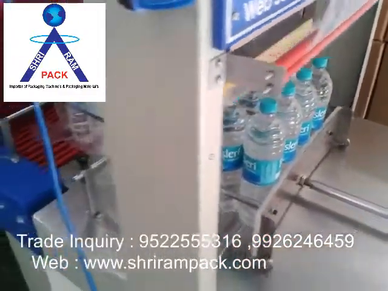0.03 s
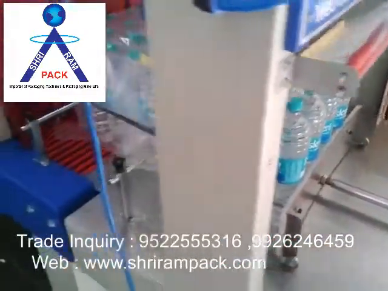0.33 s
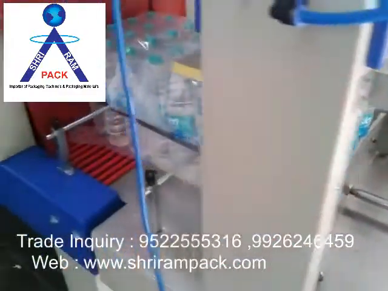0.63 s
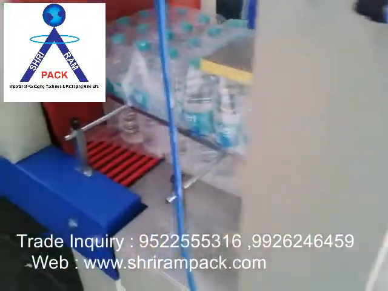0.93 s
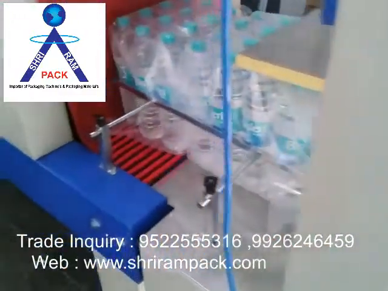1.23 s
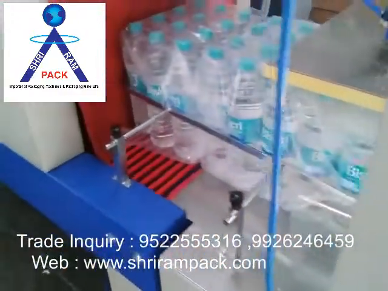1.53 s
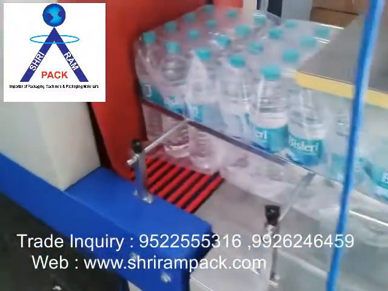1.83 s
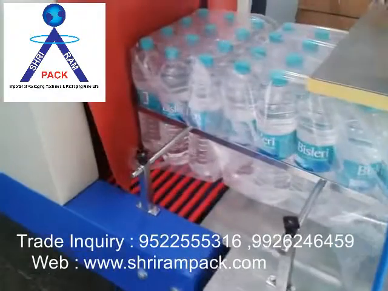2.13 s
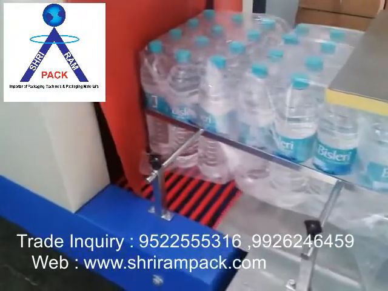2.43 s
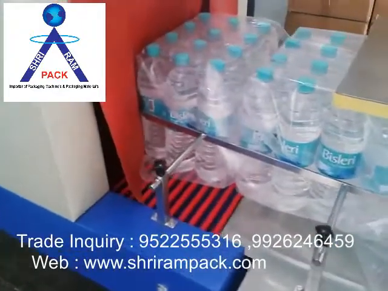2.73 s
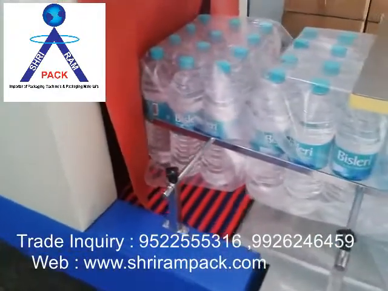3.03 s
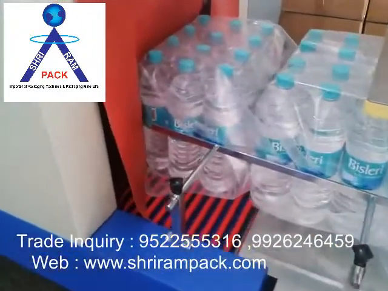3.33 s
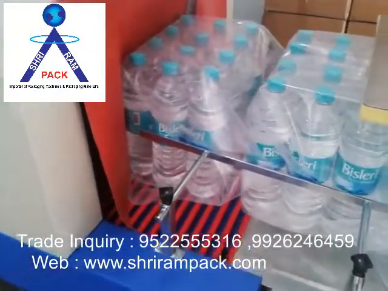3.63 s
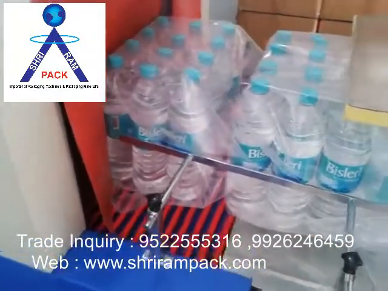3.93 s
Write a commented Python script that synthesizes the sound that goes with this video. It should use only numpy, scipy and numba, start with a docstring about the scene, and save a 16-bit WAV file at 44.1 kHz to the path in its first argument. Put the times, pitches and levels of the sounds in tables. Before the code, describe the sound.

A packaging machine hums and rattles in quick surges in a workshop. Halfway through, a valve cracks open and vents a loud, whistling air hiss over a few dull knocks, then spits shut. The microphone is close.

```python
"""A workshop, close to a running shrink-wrapping machine, on one mono microphone.
The blower hums and the sheet metal rattles in surges, about ten a second. Two seconds in, a pneumatic
valve cracks open and vents air for nearly two seconds: the exhaust rings louder and higher while the
first buffeting dies away. The mechanism knocks as it travels; the valve spits shut and the surges
return. At this short distance the microphone overloads on the hiss."""
import sys
import numpy as np
from scipy import signal
from scipy.fft import rfft, irfft
from scipy.io import wavfile
from scipy.ndimage import uniform_filter1d
from numba import njit

SR = 44100
rng = np.random.default_rng(int(sys.argv[2]) if len(sys.argv) > 2 else 0)


def digitize_waveform(pressure):
    """Quantize a signal to 16-bit integers and store it at the path in sys.argv[1].

    Rows of a 2-D input are taken as channels; values are limited to [-1, 1].
    """
    field = np.atleast_2d(pressure).T
    bounded = np.clip(field, -1, 1)
    quanta = np.round(bounded * 32767).astype(np.int16)
    wavfile.write(sys.argv[1], SR, quanta)


N = 176400
t = np.arange(N) / SR


def undb(db):
    return 10 ** (np.asarray(db) / 20)


def unit(x):
    """Scale to rms 1."""
    return x / np.sqrt(np.mean(x ** 2))


def noise():
    return rng.standard_normal(N)


def curve(rows, column):
    """One column of a table, joined by straight lines in time."""
    rows = np.array(rows, float)
    return np.interp(t, rows[:, 0], rows[:, column])


def equalise(x, outline):
    """Filter by a (frequency [Hz], gain [dB]) outline."""
    hz, db = np.array(outline, float).T
    gain_db = np.interp(np.log(np.fft.rfftfreq(N, 1 / SR) + 1), np.log(hz), db)
    return irfft(rfft(x) * undb(gain_db), N)


def coloured_noise(outline):
    return unit(equalise(noise(), outline))


def butterworth(x, hz, kind):
    return signal.sosfilt(signal.butter(2, hz, kind, fs=SR, output="sos"), x)


def drift(rate_hz):
    """Smooth random wander, rms 1."""
    hold = int(SR / rate_hz)
    steps = np.repeat(rng.standard_normal(N // hold + 1), hold)
    return unit(uniform_filter1d(uniform_filter1d(steps, hold), hold)[:N])


@njit
def bandpass(x, hz, width):
    """State-variable filter whose centre and width may move."""
    y, band_state, low_state = np.empty(len(x)), 0., 0.
    for i in range(len(x)):
        gain, damping = np.tan(np.pi * hz[i] / SR), width[i] / hz[i]
        band = (band_state + gain * (x[i] - low_state)) / (1 + gain * (gain + damping))
        band_state = 2 * band - band_state
        low_state += 2 * gain * band
        y[i] = damping * band
    return y


def ring(excite, modes):
    """Resonances, each driven by its own draw of excite(); rms 1 together."""
    return unit(sum(undb(db) * bandpass(excite(), np.full(N, float(hz)), np.full(N, float(width)))
                    for hz, width, db in modes))


def bursts(rows, outline, rise_s):
    """Coloured noise bursts with a sharp start and an exponential tail."""
    envelope = 0
    for start, db, decay in rows:
        age = np.maximum(t - start, 0)
        envelope += undb(db) * (1 - np.exp(-age / rise_s)) * np.exp(-age / decay)
    return envelope * coloured_noise(outline)


# Surges through the machine (time [s], relative panel level [dB], relative rail level [dB])
SHAKE_SURGES = [(.02, 1, -6), (.075, -0.5, -5), (.155, 2.5, -2.5), (.255, 4, 0.5), (0.351, 2, 1),
                (.46, 2, 2), (.55, 3, -0.5), (.63, -3, -4.5), (0.719, 1, 1), (0.806, 0.5, 0),
                (0.909, 2.5, -1.5), (.97, -2.5, -6), (1.025, 4, -2), (1.11, 1.5, -0.5), (1.205, -3, -13),
                (1.378, 1.5, -1.5), (1.457, 0.5, 0.5), (1.56, 2.5, 1.5), (1.659, 4, 2.5), (1.745, -2, -7),
                (1.86, -3, -3.5), (3.875, -4, -1), (3.93, -5.5, -2), (3.985, -8, -0.5)]
def shaking(column, rest_db, half_width_s=0.033):
    """The machine shakes in rounded surges over a resting level; the envelope has rms 1."""
    power = undb(rest_db) ** 2
    for surge in SHAKE_SURGES:
        bell = np.exp(-np.abs((t - surge[0]) / half_width_s) ** 2.22)  # slightly flat on top
        power += undb(surge[column]) ** 2 * bell
    return unit(np.sqrt(power))


# Motor and blade tones radiated by the panels (frequency [Hz], level [dB])
BLOWER_TONES = [(130, -58.5), (441, -38.5), (489.5, -34), (1087, -51), (1798, -47.5), (2223, -40)]
# Colour of the blower's air (frequency [Hz], relative level [dB])
BLOWER_COLOUR = [(30, -26), (70, -15), (130, -10), (190, -16), (260, -1), (800, 5), (1300, -4.5), (2000, 3),
                 (2700, -6.5), (5500, -2), (9000, -22.5), (15500, -27)]
def blower(panel_shake):
    """Steady air noise, with wavering motor and blade tones that swell as the panels shake."""
    tones = 0
    for hz, db in BLOWER_TONES:
        amplitude = np.sqrt(2) * undb(db + 2 * drift(14))
        wavering_hz = hz * (1 + 0.003005 * drift(12))
        tones += amplitude * np.sin(2 * np.pi * np.cumsum(wavering_hz) / SR)
    air = undb(-27 + 0.84 * drift(8)) * coloured_noise(BLOWER_COLOUR)
    return tones * panel_shake + air


def contacts(per_second=2500, spread_db=3.0):
    """Dense tiny impacts of uneven strength."""
    hits = (rng.random(N) < per_second / SR) * np.sign(noise())
    strength = undb(spread_db * np.minimum(rng.exponential(size=N), 4))
    return unit(hits * strength)


# Ringing of the panels and loose guide rails (frequency [Hz], width [Hz], relative level [dB])
PANEL_MODES = [(257, 21.5, -0.5), (426, 36, 1), (480.8, 10.8, 4.5), (720, 43, -9), (967, 80, -7),
               (1077, 35, 2.5), (1590, 98, -4.5), (1798, 78, -6), (2120, 47, -7.5), (2200, 36, 3.5)]
RAIL_MODES = [(3240, 120, -12.5), (3736, 59, -5.5), (3860, 93, -11), (5573, 380, -1), (6300, 350, -8),
              (7900, 370, -17.5)]
# Broad chatter of the contacts (frequency [Hz], relative level [dB])
CHATTER_COLOUR = [(100, -45.5), (250, -6.5), (600, 0), (900, -1), (1300, -5), (1800, 0), (2700, -9.5),
                  (4400, -3), (6300, -6), (7500, -20.5), (10000, -20), (15500, -30.5)]
def rattle(panel_shake, rail_shake):
    """Tiny impacts make the panels drone and the rails jingle with each surge."""
    panels = butterworth(ring(lambda: panel_shake * contacts(), PANEL_MODES), [200, 3000], "band")
    rails = butterworth(ring(lambda: rail_shake * contacts(), RAIL_MODES), 7500, "low")
    chatter = rail_shake * unit(equalise(contacts(), CHATTER_COLOUR))
    return undb(-28) * panels + undb(-23.5) * rails + undb(-29) * chatter


# Knocks of the mechanism (time [s], level [dB], decay [s])
MECHANISM_KNOCKS = [(1.999, -13, .01), (2.157, -22, 0.018), (2.663, -12, 0.022), (2.74, -16.5, 0.034),
                    (3.025, -19.5, 0.028), (3.868, -17, 0.068)]
# Their colour (frequency [Hz], relative level [dB])
KNOCK_COLOUR = [(60, -39), (150, -20), (300, 2), (480, 7), (800, 0), (1300, -1.5), (2500, -16), (8000, -33)]
def knocks():
    """The mechanism knocks dully as it travels."""
    return bursts(MECHANISM_KNOCKS, KNOCK_COLOUR, rise_s=0.0016)


def whistle(hz, width):
    """Turbulence in a moving resonance with steep sides."""
    stage_width = 1.42 * width  # two stages in series narrow the band again
    band = bandpass(bandpass(noise(), hz, stage_width), hz, stage_width)
    return unit(band / np.sqrt(width))


# Buffeting at the valve (time [s], level [dB], centre [Hz])
BUFFET_PATH = [(2.0, -20, 600), (2.06, -15.5, 465), (2.21, -16, 326), (2.37, -18, 274), (2.55, -21.5, 282),
               (2.85, -23.5, 260), (3.1, -32, 260), (3.4, -60, 260)]
def buffet(flutter_db=1.5):
    """Eddies of the escaping air: a fluttering rumble that sinks and fades."""
    hz = curve(BUFFET_PATH, 2)
    eddies = butterworth(bandpass(noise(), hz, 0.93 * hz), 125, "high")
    return undb(curve(BUFFET_PATH, 1) + flutter_db * drift(45.13)) * unit(eddies / np.sqrt(hz))


# Exhaust, close up (time [s], level [dB], centre [Hz], width [Hz], octave level [dB], duct level [dB])
EXHAUST_PATH = [(2.0, -16, 5100, 1500, -31, -45), (2.18, -17, 5050, 1400, -30, -49),
                (2.4, -13.5, 5110, 1140, -25, -45), (2.65, -9.5, 5410, 1040, -24, -24),
                (2.9, -8.5, 5500, 1010, -24, -26), (3.15, -5, 5680, 1130, -27, -19.5),
                (3.45, -6, 5880, 1230, -42, -19.5), (3.78, -8.5, 5900, 1420, -49, -20)]
# Its narrow whistling core and the duct's resonances (frequency [Hz], width [Hz], relative level [dB])
CORE_MODES = [(5313, 87, 5), (5727, 190, 3.5), (6190, 70, -5), (6590, 89, -7.5)]
DUCT_MODES = [(2344, 300, 3), (2500, 280, -2), (7140, 200, 5.5), (8400, 220, -9), (14200, 2000, -6)]
# Broad rush of the jet (frequency [Hz], relative level [dB])
RUSH_COLOUR = [(100, -51), (400, -5.5), (1000, 1.5), (1700, 1), (2350, 2), (3300, 0.5), (4500, 0.5),
               (7000, 2.5), (9300, -0.5), (12500, -2), (15500, -0.5)]
def air_jet(open_s=1.999, shut_s=3.775, rise_s=0.0012, decay_s=0.01, echo_s=0.00226):
    """Air rushes through the valve, rings exhaust and duct, and buffets; a panel mirrors the hiss."""
    valve = np.clip((t - open_s) / rise_s, 0, 1) * np.exp(-np.maximum(t - shut_s, 0) / decay_s)
    hz = curve(EXHAUST_PATH, 2) * (1 + 0.014 * drift(60))
    width = curve(EXHAUST_PATH, 3)
    exhaust = whistle(hz, width) + undb(-8) * ring(noise, CORE_MODES)
    exhaust *= undb(curve(EXHAUST_PATH, 1) + 0.5 * drift(30.05))
    octave = whistle(2 * hz, 2 * width) * undb(curve(EXHAUST_PATH, 4))
    duct = ring(noise, DUCT_MODES) * undb(curve(EXHAUST_PATH, 5))
    rush = undb(-17 + 0.5 * drift(24.55)) * coloured_noise(RUSH_COLOUR)
    hiss = valve * (exhaust + octave + duct + rush)
    panel_echo = undb(-18.5) * np.interp(t - echo_s, t, hiss)  # about 0.8 m further to the microphone
    return hiss + panel_echo + valve * buffet()


# Spits of air at the valve (time [s], level [dB], decay [s])
VALVE_SPITS = [(2.001, -0.5, .03), (3.794, -16.5, .03), (3.826, -14, 0.014)]
# Their colour (frequency [Hz], relative level [dB])
SPIT_COLOUR = [(100, -24), (500, -1.5), (1500, -9), (2300, -6), (3000, -11), (4500, 3), (5900, -4),
               (6600, 1.5), (8200, -13), (10000, -15), (15500, -26)]
def spits():
    """The valve spits air as it switches: one crack on opening, two softer ones on shutting."""
    return bursts(VALVE_SPITS, SPIT_COLOUR, rise_s=0.002)


def scene():
    """The machine from close by, the same in both channels."""
    panel_shake = shaking(column=1, rest_db=-7.5)
    rail_shake = shaking(column=2, rest_db=-6)
    sound = blower(panel_shake) + rattle(panel_shake, rail_shake) + knocks() + air_jet() + spits()
    return np.array([sound, sound])


# Colour of the microphone after the overload (frequency [Hz], gain [dB])
MIC_RESPONSE = [(400, -1.5), (1500, -0.4), (3300, 0), (4500, 0), (6000, 0.16), (8000, 0.5), (11500, -0.4),
                (15000, 0)]
def record(dry, overload_db=-5.5, knee=4.0, bass_hz=138, top_hz=15750):
    """The close microphone flattens loud peaks, thins the bass, colours the rest and cuts the top."""
    oversampled = signal.resample_poly(dry, 2, 1, axis=1)
    flattened = oversampled / (1 + np.abs(oversampled / undb(overload_db)) ** knee) ** (1 / knee)
    thinned = butterworth(signal.resample_poly(flattened, 1, 2, axis=1), bass_hz, "high")
    top_cut = signal.ellip(10, 0.05, 60, top_hz, fs=SR, output="sos")
    return signal.sosfiltfilt(top_cut, equalise(thinned, MIC_RESPONSE))


dry = scene()
out = record(dry)
digitize_waveform(out)
```